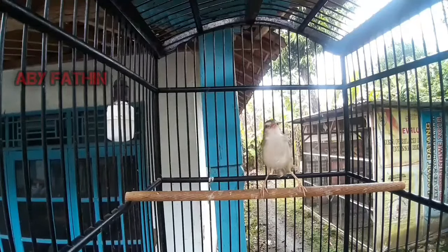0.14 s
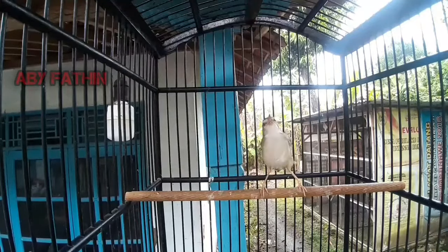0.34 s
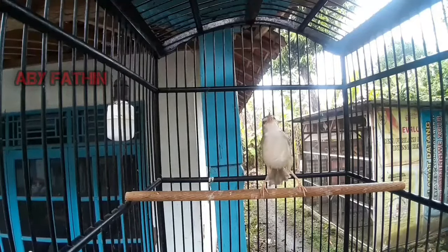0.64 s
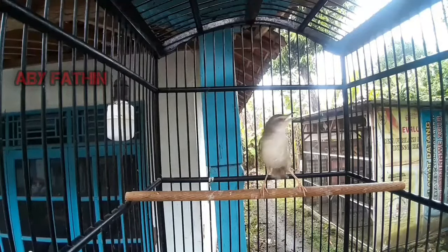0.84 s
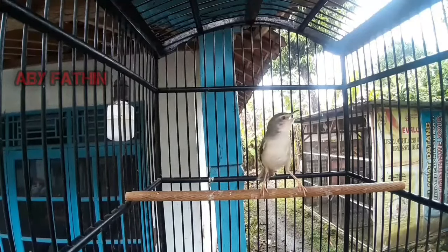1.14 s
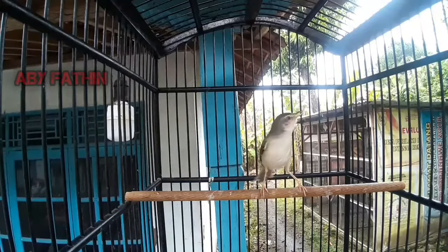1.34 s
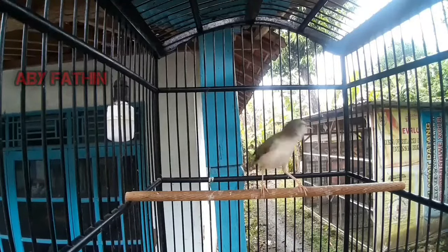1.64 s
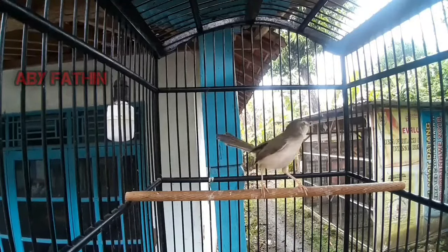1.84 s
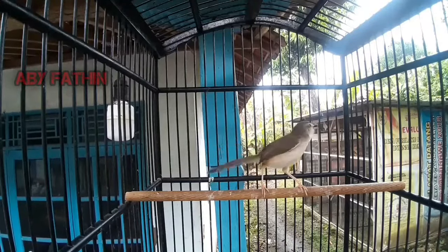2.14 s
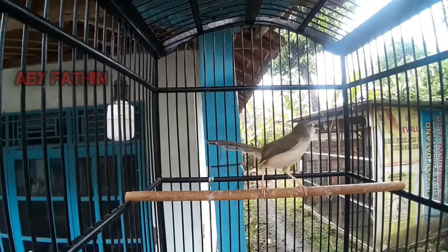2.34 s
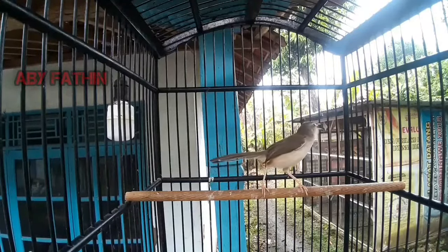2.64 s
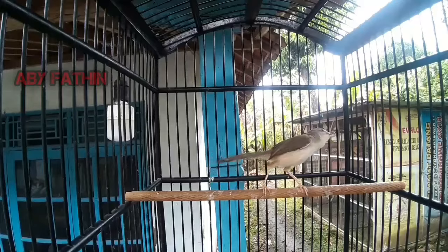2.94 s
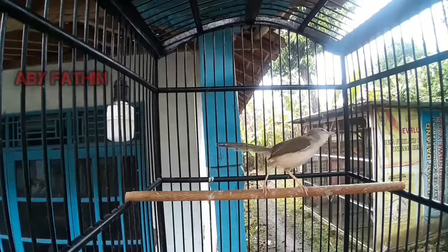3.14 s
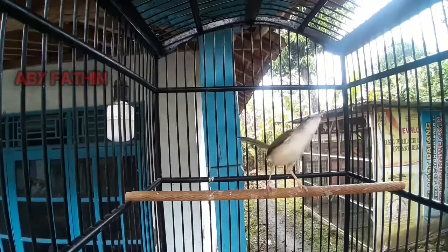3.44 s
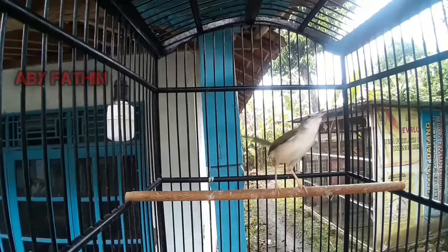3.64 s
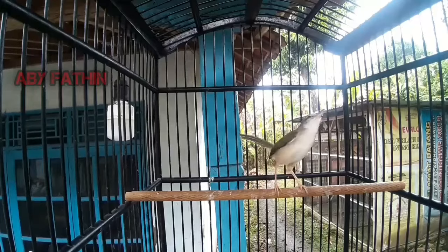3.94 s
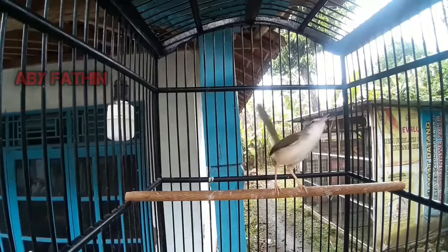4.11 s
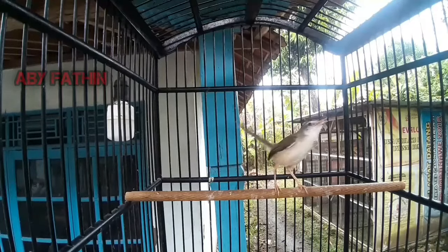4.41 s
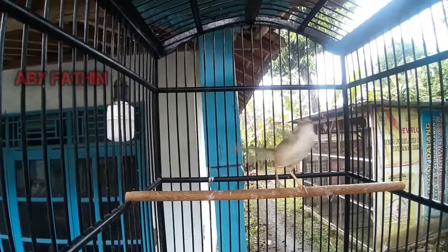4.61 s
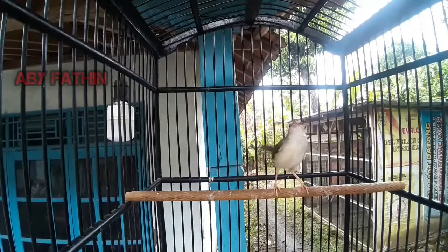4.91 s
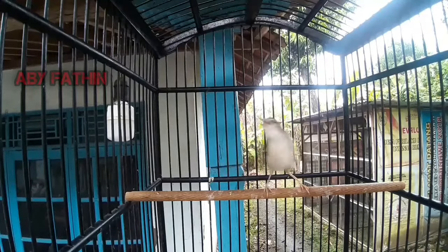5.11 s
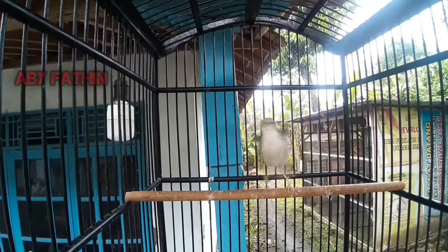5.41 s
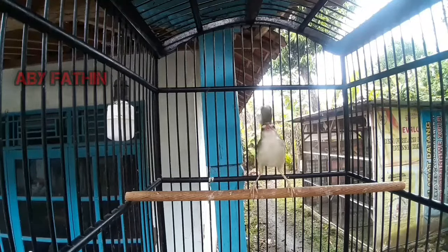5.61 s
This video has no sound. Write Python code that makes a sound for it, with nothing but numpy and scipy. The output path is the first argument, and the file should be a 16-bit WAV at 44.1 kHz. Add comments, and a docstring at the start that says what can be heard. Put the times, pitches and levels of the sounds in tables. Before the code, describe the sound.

A small caged bird rattles out rapid, even, sharp clicking chirps up close, over a faint outdoor rumble.

```python
"""Sharp clicks and quick arched chirps, close to the microphone: a prinia rattles in a wire porch cage.
About six calls a second follow one phrase: a soft hiss, then clicks that ring the throat's resonance,
alternating with chirps whose octave is loudest. Cage and porch walls throw the calls back.
Behind the bird are soft rustles, thin whistles near the end, a farther bird and faint far-off tones,
all over a low outdoor rumble."""
import sys
import numpy as np
from scipy import signal
from scipy.fft import rfft, irfft
from scipy.io import wavfile
from scipy.ndimage import map_coordinates

SR = 44100
rng = np.random.default_rng(int(sys.argv[2]) if len(sys.argv) > 2 else 0)


def generate_wav(sig):
    """Save sig (samples, or channels by samples) to the path in sys.argv[1] as 16-bit PCM at SR."""
    pcm = np.round(np.clip(np.atleast_2d(sig).T, -1, 1) * 32767).astype(np.int16)
    wavfile.write(sys.argv[1], SR, pcm)


N = 254016

# The close bird's calls, levels relative: first_hard_click_s, chirp_count, beat_s, hiss_db, chirp_db,
# top_pitch_hz, click_db, click_pitch_hz, closing_click_db
CALLS = [(-.005, 4, 0.021, -40, -23.5, 2784, -12, 4420, -44),
         (0.1542, 3, 0.022, -36.5, -23.3, 2800, -11, 4254, -13),
         (0.3151, 4, 0.022, -40, -25, 2725, -11, 4510, -21.5),
         (0.4857, 2, 0.022, -43, -24.5, 2834, -12, 4500, -11.5),
         (0.6111, 3, .0205, -39, -24.5, 2628, -12, 4570, -20.5),
         (0.7708, 3, 0.021, -39.5, -23, 2793, -11.5, 4490, -10),
         (0.9322, 3, 0.022, -39.5, -25, 2742, -13, 4340, -13),
         (1.097, 4, .021, -38.5, -26.5, 2767, -14, 4445, -37),
         (1.2617, 4, 0.022, -40, -24, 2795, -14, 4550, -40),
         (1.465, 4, .0211, -39, -25.5, 2777, -14, 4524, -41),
         (1.6355, 4, 0.02, -40, -24, 2756, -12.5, 4500, -33.5),
         (1.7918, 3, 0.02, -43.5, -26.5, 2756, -17, 4000, -23.5),
         (1.9382, 3, 0.021, -39.5, -26, 2775, -16.5, 4480, -28),
         (2.0771, 3, .0217, -42, -27, 2793, -17.5, 4350, -16.5),
         (2.2294, 3, 0.022, -44, -26, 2880, -15, 4250, -21),
         (2.3812, 3, 0.022, -41, -26.5, 2817, -19, 4210, -35),
         (2.518, 3, 0.022, -43, -27.5, 2800, -17, 4230, -20.5),
         (2.6751, 3, 0.021, -45, -30, 2682, -17.5, 4170, -28),
         (2.8123, 3, 0.022, -45.5, -30, 2572, -19.5, 4270, -29),
         (2.966, 4, 0.022, -44.5, -27.5, 2728, -18, 4285, -41),
         (3.356, 4, .018, -43, -25.5, 2712, -12.5, 4200, -30.5),
         (3.6141, 5, 0.019, -44, -25.5, 2710, -13.5, 4270, -36),
         (3.999, 4, .018, -55.5, -24.5, 2635, -13.5, 4197, -28),
         (4.166, 4, .02, -45, -22.5, 2827, -13.5, 4186, -28.5),
         (4.3354, 3, 0.02, -43, -23.5, 2700, -14, 4136, -25),
         (4.478, 3, 0.022, -42, -24, 2698, -15, 4256, -26),
         (4.6264, 3, 0.02, -39, -22, 2636, -12, 4260, -18),
         (4.7703, 3, 0.021, -39, -23, 2740, -11.5, 4360, -18),
         (4.9249, 4, 0.02, -42, -23.5, 2710, -11, 4504, -39),
         (5.083, 3, .02, -37.5, -21.5, 2696, -8, 4390, -13.7),
         (5.2434, 4, .0208, -41, -24, 2710, -11.5, 4465, -18),
         (5.43, 4, 0.017, -42, -22, 2700, -10, 4423, -39),
         (5.5843, 4, 0.021, -39.5, -23.5, 2728, -10.5, 4480, -15),
         (5.7542, 2, 0.03, -39, -24, 2817, -16, 3970, -20)]
# Opening, rising, peak and trailing beat, relative to the call: click_db, click_pitch_ratio, pause_s,
# chirp_db, top_pitch_ratio, fall_hz, crest_share, fundamental_db (against the octave)
PHRASE = [(-8.5, .965, .0052, -4.5, .86, 705, .33, -9), (0.2, .975, .0034, -0.9, .96, 860, .53, -7.5),
          (0.64, 1.015, .0041, 0.45, 1.005, 900, .52, -10), (0.7, 1.02, .0038, -4, .95, 447, .54, -10)]
# How the bird faces the microphone: time_s, left_over_right_db, cage_db, rasp_db
STANCE = [(0, 2, -2.5, 11.5), (0.802, 1.6, -3.5, 9.5), (1.3, 0, -5, 8.5), (1.7, -0.5, 1.5, 11),
          (2.2, -0.5, -1.5, 10), (3.002, -1.3, 0.5, 11.5), (3.6, 1, -0.5, 10.5), (4.301, 0.5, -0.5, 10.5),
          (5.1, 2.5, -2.5, 6.5), (5.76, 1.5, 0.5, 12)]
# Throat and beak resonances on a chirp's partials: frequency_hz, gain_db
THROAT = [(1400, -50), (1900, -13), (2500, -8), (3000, -8.5), (3500, 8), (4300, 7.5), (5400, 8.5),
          (6200, 11), (7000, 4), (8000, 4.5), (9000, -14.5), (12000, 2.5), (15000, -1.5)]
# A chirp's upper partials, ahead of the throat: multiple, level_db (against the octave)
OVERTONES = [(3, -12.5), (4, -20), (5, -23), (6, -34.5)]
# The open beak, colouring the whole call: frequency_hz, gain_db
BEAK = [(950, -12.5), (1300, 0.5), (2650, 0.5), (3050, -2.5), (3700, -0.5), (4400, 0), (5600, 0),
        (6200, -5.5), (8200, -1), (8900, 1), (10000, 4.5), (11100, 4), (12400, 6.5), (15500, -7)]
# Turbulence in the voice: frequency_hz, density_db
RASP = [(500, -67), (1000, -26.5), (1400, -18.5), (2200, 2), (3000, 3.5), (4100, 11), (5200, 4),
        (6300, -21), (8000, -25), (10000, -27), (12500, -35), (15500, -14)]
# The hiss that opens a call: frequency_hz, density_db
HISS = [(700, -40), (1350, -8), (2300, -10.5), (4000, 6.5), (5200, -5.5), (6500, -17), (15000, -44.5)]
# The bright snap on each click: frequency_hz, density_db
SNAP = [(3000, -37), (5200, 7.5), (6500, 6.5), (8500, -4.5), (11000, -15), (15000, -13.5)]
# Decay off the porch walls: frequency_hz, t60_s
PORCH_DECAY = [(500, 1), (2500, 0.3), (4500, 0.3), (8000, 0.48), (15000, 0.84)]
# Thin high pips from the cage: start_s, length_s, start_hz, end_hz, level_db
WHISTLES = [(5.67, .019, 7800, 7820, -38), (5.685, .035, 7800, 7830, -47), (5.712, .026, 9040, 9010, -45),
            (5.655, .09, 10100, 10080, -53)]
# Soft rustles: start_s, length_s, centre_hz, width_octaves, level_db
RUSTLES = [(0.105, 0.13, 726, 0.37, -67.5), (1.354, 0.081, 7240, .2, -63), (2.3, 0.74, 705, 0.26, -80),
           (2.852, 0.096, 8100, 0.33, -67), (3.662, 0.19, 7160, 0.13, -68.5),
           (4.106, 0.2, 650, 0.45, -66.5), (4.3, 0.34, 830, 0.29, -73), (4.58, 0.13, 890, 0.3, -65),
           (5.104, 0.6, 447, 0.52, -72.5), (5.63, 0.12, 8700, 0.37, -61)]
# A farther bird's falling slur: start_s, length_s, start_hz, end_hz, relative_db
FAR_SLUR = [(3.112, .07, 4600, 4450, -55), (3.172, .055, 4250, 3850, -58)]
# Faint far-off tones: start_s, length_s, start_hz, end_hz, level_db
FAR_TONES = [(2.38, .15, 635, 628, -72), (2.36, .21, 785, 792, -79), (2.88, .2, 598, 585, -79),
             (3.47, .18, 556, 545, -76), (4.1, .15, 648, 665, -70)]
# Distant rumble: frequency_hz, density_db
RUMBLE = [(15, -47), (25, -22.5), (64, 0.5), (112, 1.5), (217, -5.5), (301, -7), (541, -17), (900, -27),
          (1170, -53.5), (1980, -120)]
# Airy outdoor hiss: frequency_hz, density_db
AIR = [(300, -37.5), (1000, 1), (2500, 5), (4500, -4), (7000, 0), (15000, -15)]
# Likeness of the background at the microphone's two ports: frequency_hz, correlation
PORT_LIKENESS = [(60, 1), (130, 0.91), (250, 0.88), (500, 0.27), (2000, 0), (15000, 0)]

OPENING_S, SLOWING = .0175, 1.13  # the first beat is short; those after the second stretch by SLOWING
HISS_LEAD_S, CHIRP_GAP_S = 0.014, 0.00042  # hiss start to first tick; chirp end to next click
LIMP_DB, FIRM_DB = -37.5, -22  # closing click of a call that trails off, and of one that keeps its force
CHIRP_SPREAD_DB, CLICK_SPREAD_DB, PITCH_SPREAD = 1.0, 1.0, .016  # chance from beat to beat


def prinia(rasp_db):
    """The close bird: hisses, chirps, clicks and rasp, all leaving through the open beak."""
    hiss_rows, click_rows, chirp_rows = rattle()
    chirp, chirp_rasp = chirps(chirp_rows)
    click, click_rasp = clicks(click_rows)
    rasp = np.hypot(chirp_rasp, click_rasp) * amp(rasp_db) * turbulence()
    return colour(hisses(hiss_rows) + chirp + click + snaps(click_rows) + rasp, BEAK)


def rattle():
    """Times each call: a hiss, slightly uneven beats of one click and one chirp, a closing click."""
    hiss_rows, click_rows, chirp_rows = [], [], []
    opening, rising, peak, trailing = np.array(PHRASE)
    chance = rng.standard_normal((len(CALLS), 5, 4))
    for call, call_luck in zip(CALLS, chance):
        s, count, beat, hiss_db, chirp_db, top_hz, click_db, click_hz, close_db = call
        s -= OPENING_S
        hiss_rows.append((s - HISS_LEAD_S, hiss_db))
        lengths = [OPENING_S, beat] + [beat * SLOWING] * (round(count) - 2)
        # a short call breaks off early, a long one repeats its peak beat
        steps = [opening, rising, peak] + [peak] * (round(count) - len(PHRASE))
        # the harder the closing click, the more the trailing beat keeps the force of the peak
        force = np.clip((close_db - LIMP_DB) / (FIRM_DB - LIMP_DB), 0, 1)
        steps.append(trailing + force * (peak - trailing))
        for length, step, luck in zip(lengths, steps, call_luck):
            accent_db, click_ratio, pause, stress_db, top_ratio, fall, crest, low_db = step
            tick_db = click_db + accent_db + CLICK_SPREAD_DB * luck[0]
            tick_hz = click_hz * click_ratio * (1 + PITCH_SPREAD * luck[1])
            click_rows.append((s, tick_db, tick_hz))
            top = top_hz * top_ratio * (1 + PITCH_SPREAD * luck[2])
            voice_db = chirp_db + stress_db + CHIRP_SPREAD_DB * luck[3]
            chirp_s = length - pause - CHIRP_GAP_S
            chirp_rows.append((s + pause, chirp_s, top, fall, crest, voice_db, low_db))
            s += length
        click_rows.append((s, close_db, click_hz * click_ratio))
    return hiss_rows, click_rows, chirp_rows


def clicks(rows, width_s=0.001005, sweep_hz=1000, zip_db=-19, rasp_db=-24, rasp_width_s=0.0012):
    """A steep upward zip crosses the throat's resonance, which flares. Gives tone and rasp strength."""
    tone, rasp = np.zeros(N), np.zeros(N)
    t = np.arange(-SR // 200, SR // 200) / SR
    rise = np.tanh((t + .0014) / .0007) - .93
    zip_hz = 5800 + 4000 * np.tanh((t + .0009) / .0015)
    zipping = bell(t + .0008, .0009) * np.sin(phase_of(zip_hz))
    flare = np.exp(-.5 * abs(t / width_s) ** 3.2)
    for s, db, hz in rows:
        # soft ticks keep gliding upward, hard clicks lock to the resonance
        bend_hz = np.interp(db, [-20, -14], [450, -80])
        phase = phase_of(hz + sweep_hz * rise + bend_hz * t / width_s)
        add(tone, s + t[0], amp(db) * (flare * np.sin(phase) + amp(zip_db) * zipping))
        add(rasp, s + t[0], amp(db + rasp_db) * bell(t, rasp_width_s))
    return tone, rasp


def chirps(rows, jitter=0.012, rasp_db=-18, ends_db=7, climb_db=6, crest_db=4, blur=0.92):
    """Arched tones through the throat, raspiest where the pitch is low. Gives tone and rasp strength."""
    tone, rasp = np.zeros(N), np.zeros(N)
    drift, scatter = wobble(N, hz=736), wobble(N, hz=1490)
    flutter = amp(1.3 * wobble(N, hz=400))
    for s, length, top, fall, crest, voice_db, low_db in rows:
        u = np.linspace(0, 1, int(length * SR))
        at = (round(s * SR) + np.arange(len(u))) % N
        crest = np.clip(crest, .1, .9)
        from_crest = np.where(u < crest, (crest - u) / crest, (u - crest) / (1 - crest))
        sag = np.sin(np.pi / 2 * from_crest) ** 2
        hz = (top - fall * sag) * (1 + jitter * drift[at])
        phase = phase_of(hz)
        shape = swell(u, edge=0.15) * amp(climb_db * u - crest_db * sag) * flutter[at]

        def partial(k):
            """Uneven cycles smear the partials above the octave, the higher the more."""
            smear = blur * max(k - 2.5, 0) * scatter[at]
            return shape * amp(read(THROAT, k * hz)) * np.sin(k * phase + smear)

        upper = sum(amp(db) * partial(round(k)) for k, db in OVERTONES)
        fundamental = amp(low_db) * unit(partial(1) * swell(u, edge=0.2))
        add(tone, s, amp(voice_db) * (unit(partial(2) + upper) + fundamental))
        add(rasp, s, amp(voice_db + rasp_db + ends_db * (sag - 1.5)) * swell(u, edge=0.054))
    return tone, rasp


def snaps(rows, width_s=0.00046, lead_s=0.00049, gain_db=-19):
    """Each click begins with a spit of treble about a millisecond long."""
    strength, t = np.zeros(N), np.arange(-SR // 400, SR // 400) / SR
    for s, db, _ in rows:
        add(strength, s - lead_s + t[0], amp(db + gain_db) * bell(t, width_s))
    return strength * noise(SNAP)


def hisses(rows, length_s=0.015, gain_db=2):
    """A dull scratch swells just before the first click of a call."""
    strength, u = np.zeros(N), np.linspace(0, 1, int(length_s * SR))
    for s, db in rows:
        add(strength, s, amp(db + gain_db) * swell(u, edge=0.24))
    return strength * noise(HISS)


def turbulence(spurt_db=3.5):
    """Turbulence in the voice comes in tiny uneven spurts."""
    return unit(noise(RASP) * amp(spurt_db * wobble(N, hz=900)))


def microphone(x, t, lag_us=40):
    """Direct sound reaches the left port first, then the right, then the left again as the bird turns."""
    rightward = np.interp(t, [0, .8, 1.6, 4.6, 5.1], [-0.87, -0.92, 1, 1, -1])
    shift = lag_us * 1e-6 * SR * rightward / 2
    return np.array([map_coordinates(x, [np.arange(N) + d], order=5) for d in (-shift, shift)])


def cage(x, poses=14):
    """Quick bright reflections off the cage wires and roof; their pattern changes with each pose."""
    pose = np.linspace(0, poses - 1, N)
    bright = colour(x, [(5500, -2.5), (8000, 4.5)])
    shares = (np.cos(np.pi / 2 * np.minimum(abs(pose - k), 1)) for k in range(poses))
    return sum(echoes(bright * share, [(4000, 0.03)], delay_s=0.00073, size=2048) for share in shares)


def echoes(x, t60, delay_s, size, per_second=6000):
    """Sparse reflections of random sign, separate for each port, each band dying at its own speed."""
    taps = rng.choice([-1., 1.], (2, size)) * (rng.random((2, size)) < per_second / SR)
    hz, t, bands = signal.stft(taps, SR, nperseg=64)
    tail = signal.istft(bands * amp(-60 * t / read(t60, hz)[:, None]), SR, nperseg=64)[1]
    tail = np.pad(tail, ((0, 0), (int(delay_s * SR), 0)))
    wet = signal.fftconvolve(x[None], tail, axes=1)[:, :N]
    return wet * x.std() / wet.std(axis=1, keepdims=True)


def whistles(rows, waver):
    """Faint, nearly pure glides."""
    out = np.zeros(N)
    for s, length, start, end, db in rows:
        u = np.linspace(0, 1, int(length * SR))
        hz = (start + (end - start) * u) * (1 + waver * wobble(len(u), hz=200))
        add(out, s, amp(db) * unit(swell(u, edge=0.18) * np.sin(phase_of(hz))))
    return out


def far_bird():
    """A falling slur from farther off, more echo than direct sound."""
    slur = whistles(FAR_SLUR, waver=.017)
    return amp(-7) * slur + amp(.5) * echoes(slur, [(4000, .35)], delay_s=.004, size=16384)


def rustles():
    """Short soft bands of uneven noise."""
    out = np.zeros(N)
    for s, length, centre, octaves, db in RUSTLES:
        u = np.linspace(0, 1, int(length * SR))
        hz = np.fft.rfftfreq(len(u), 1 / SR)
        band = bell(np.log2((hz + 1) / centre), octaves)
        brush = irfft(rfft(rng.standard_normal(len(u))) * band, len(u))
        brush *= amp(1.9 * wobble(len(u), hz=60))
        add(out, s, amp(db) * unit(brush * swell(u, edge=0.49)))
    return out


def outdoors(rumble_db=-60.5, air_db=-69.5):
    """Distant rumble, nearly the same at both ports, and a faint airy hiss; both slowly grow."""
    likeness = np.clip(read(PORT_LIKENESS, np.fft.rfftfreq(N, 1 / SR)), -1, 1)
    mid, side = (rfft(amp(rumble_db) * noise(RUMBLE) + amp(air_db) * noise(AIR)) for _ in range(2))
    mid *= np.sqrt((1 + likeness) / 2)
    side *= np.sqrt((1 - likeness) / 2)
    return irfft(np.array([mid + side, mid - side]), N) * amp(np.linspace(-.8, 1.5, N))


def amp(db):
    return 10 ** (np.asarray(db) / 20)


def phase_of(hz):
    return 2 * np.pi * np.cumsum(hz) / SR


def bell(x, width):
    return np.exp(-.5 * (x / width) ** 2)


def unit(x):
    """Scales to an rms of 1."""
    return x / np.sqrt(np.mean(x ** 2) + 1e-20)


def read(points, hz):
    """Reads a table on a log-frequency axis."""
    f, value = np.transpose(points)
    return np.interp(np.log(hz + 1), np.log(f + 1), value)


def add(mix, s, sound):
    """Mixes a sound in at time s."""
    start = round(s * SR)
    sound = sound[max(-start, 0):]
    part = mix[max(start, 0):][:len(sound)]
    part += sound[:len(part)]


def colour(x, spectrum):
    """Filters by a table of gains."""
    return irfft(rfft(x) * amp(read(spectrum, np.fft.rfftfreq(N, 1 / SR))), N)


def noise(spectrum):
    """Steady noise of a given colour, rms 1."""
    return unit(colour(rng.standard_normal(N), spectrum))


def wobble(size, hz):
    """Smooth chance up to a rate, rms about 1."""
    lowpass = signal.butter(2, hz, fs=SR, output="sos")
    return unit(signal.sosfilt(lowpass, rng.standard_normal(size + SR // 10)))[-size:]


def swell(u, edge):
    """Rises and falls softly over the given share of each end of u = 0..1."""
    return np.sin(np.pi / 2 * np.clip(np.minimum(u, 1 - u) / edge, 0, 1))


def scene():
    """The caged bird up close, the porch walls around it, the outdoors beyond."""
    t = np.arange(N) / SR
    times, *columns = np.transpose(STANCE)
    pan_db, cage_db, rasp_db = (np.interp(t, times, column) for column in columns)
    bird = prinia(rasp_db) + whistles(WHISTLES, waver=0.0071)
    # turned away, the bird is heard less directly and more off the cage
    direct = bird / np.sqrt(1 + amp(cage_db) ** 2 / 2)
    near = microphone(direct, t) * amp(0.23) + cage(direct * amp(cage_db))
    near *= amp(np.array([pan_db, -pan_db]) / 2)
    far = far_bird() + whistles(FAR_TONES, waver=0.011)
    porch = amp(-19.5) * echoes(bird, PORCH_DECAY, delay_s=0.0036, size=32768)
    return near + far + porch + rustles() + outdoors()


def record(dry, edge_hz=15850):
    """The recorder's band limit."""
    lowpass = signal.firwin(401, edge_hz, window=("kaiser", 9), fs=SR)
    return signal.oaconvolve(dry, lowpass[None], "same")


dry = scene()
out = record(dry)
generate_wav(out)
```